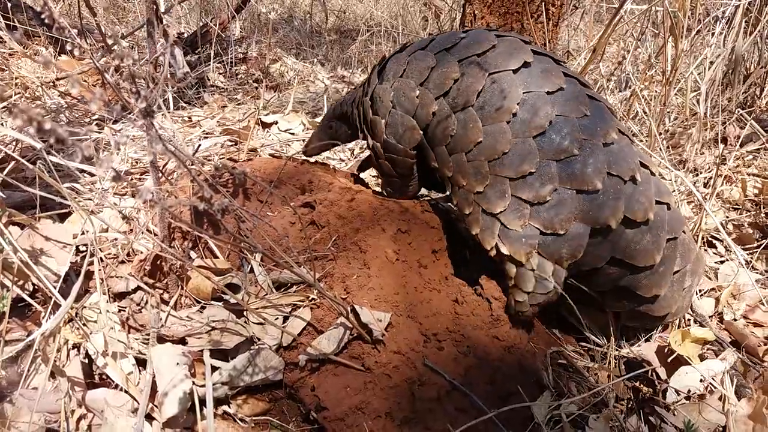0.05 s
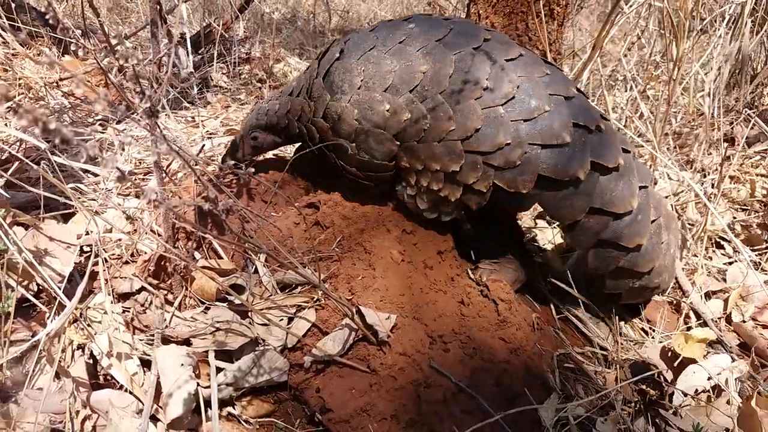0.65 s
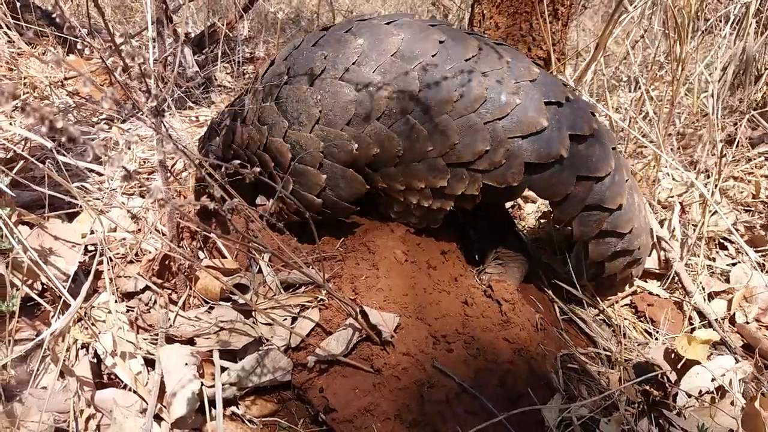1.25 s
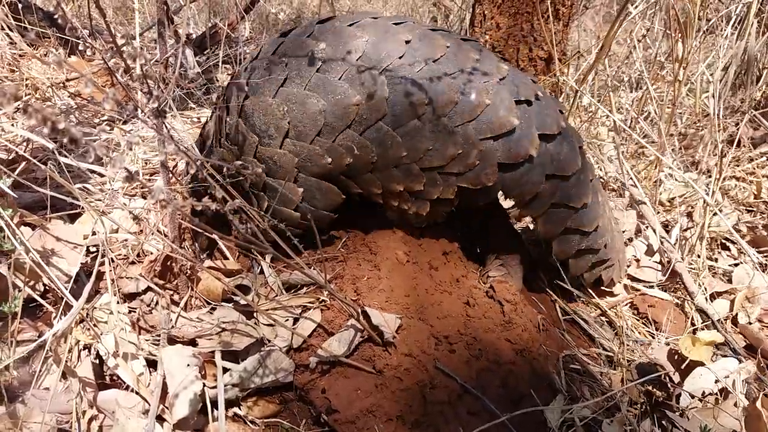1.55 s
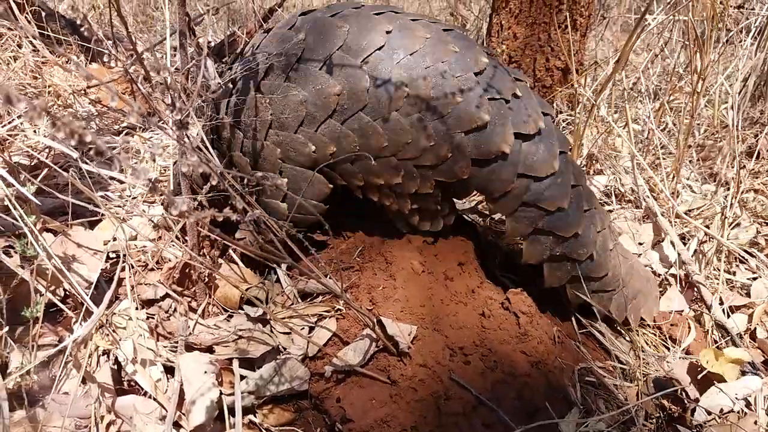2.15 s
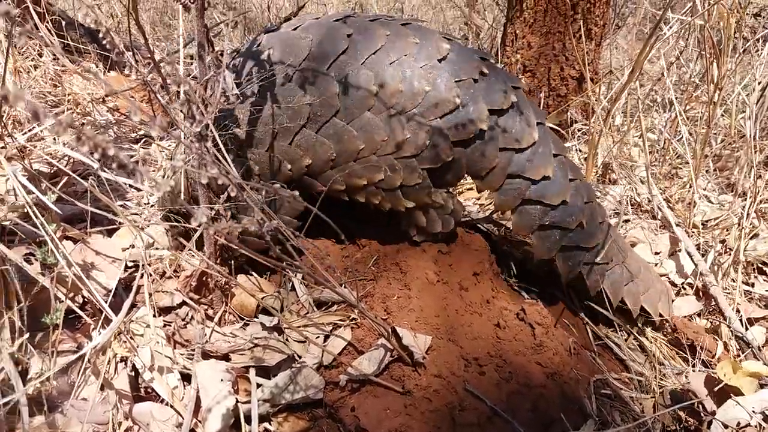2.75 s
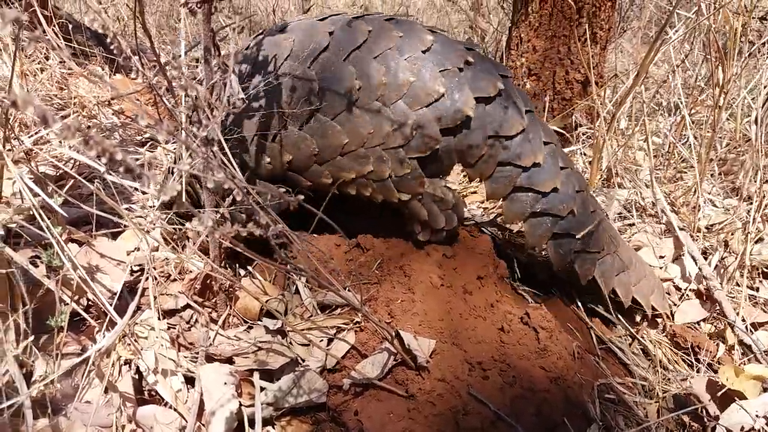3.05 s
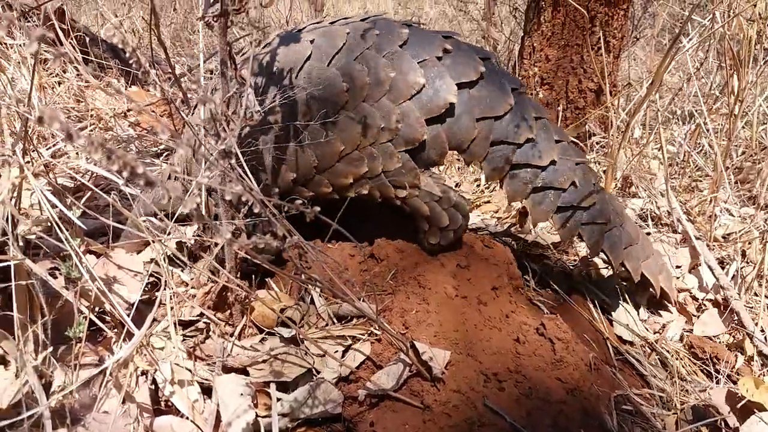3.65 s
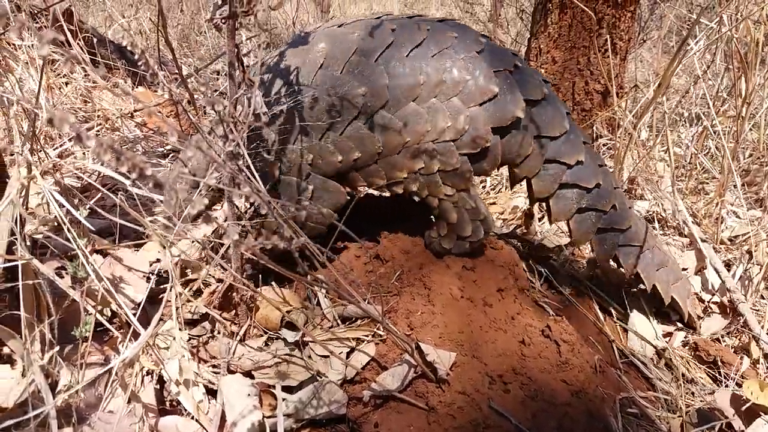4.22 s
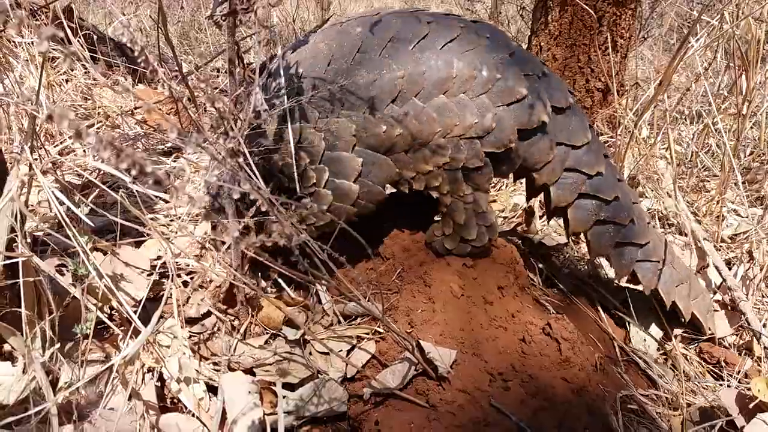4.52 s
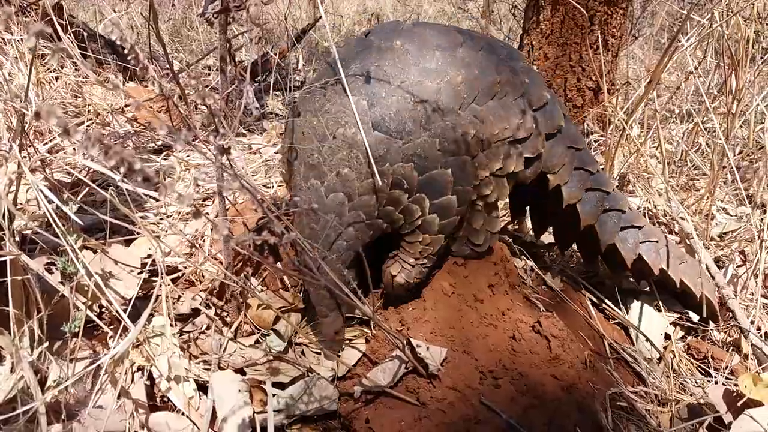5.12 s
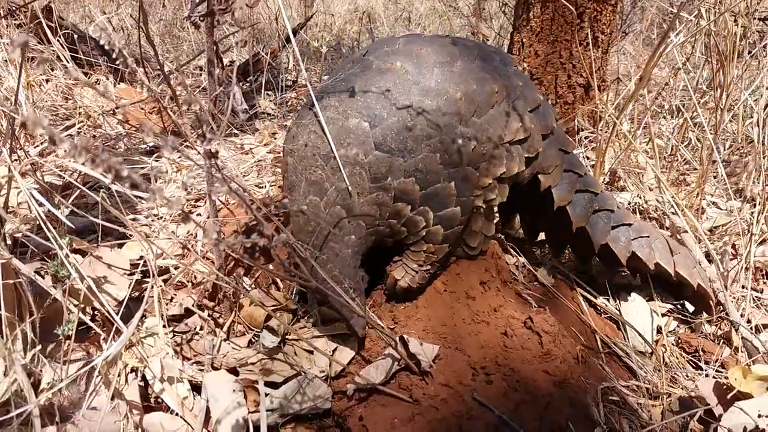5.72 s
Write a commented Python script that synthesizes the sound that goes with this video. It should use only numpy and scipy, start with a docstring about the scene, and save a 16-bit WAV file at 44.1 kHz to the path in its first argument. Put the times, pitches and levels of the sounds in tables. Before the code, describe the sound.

Claws scrape loose earth as brittle stems snap and dead leaves crackle in uneven bursts, close up over a low outdoor rumble.

```python
"""Dry bush, one microphone close to an earth mound, with a low rumble of open air behind it throughout.
A pangolin clambers over the mound: its claws scrape loose soil, and as it pushes its head into twigs
and leaves, stems snap in short clusters of fractures over a crackling rustle, hardest at 1.5 s.
A dull thump at 2.3 s, one faint far-off chirp at 2.7 s and a second thump at 3.4 s follow.
From there on the litter is mostly grass, and blades slide along the scales with a fine hiss."""
import sys
import numpy as np
from scipy import signal
from scipy.fft import rfft, irfft, next_fast_len
from scipy.io import wavfile
from scipy.ndimage import map_coordinates

SR = 44100
rng = np.random.default_rng(int(sys.argv[2]) if len(sys.argv) > 2 else 0)


def wav_record(signal):
    """Record a signal, one row per channel, as 16-bit PCM in the file named by sys.argv[1]."""
    frames = np.transpose(np.atleast_2d(signal))
    bounded = np.clip(frames, -1, 1)
    # unit amplitude maps onto the largest positive 16-bit level
    quanta = np.round(bounded * 32767).astype(np.int16)
    wavfile.write(sys.argv[1], SR, quanta)


N = 263718

# spectrum of brittle twigs and leaves: frequency_hz, level_db
TWIG_COLOUR = [(120, -23), (750, -14), (1290, -6), (1500, -8.5), (2050, -7.5), (2600, -4.5), (3760, -15.5),
               (5030, 0), (5870, -9.5), (6600, -7.5), (7700, -23), (9400, -18.5), (11000, -31.5),
               (14500, -29.5)]
# spectrum of dry grass: frequency_hz, level_db
GRASS_COLOUR = [(250, -28.5), (620, -27), (1240, -21), (1600, -3), (2080, 8), (2500, 3.5), (3150, -6.5),
                (3900, -13), (5030, 0.5), (5900, -4), (7500, -8), (8300, -8), (11400, -32), (13500, -20)]
# how much of the litter around the animal is grass: time_s, share (0-1)
GRASS_IN_LITTER = [(0, 0.14), (2.2, 0.21), (3.3, 0.23), (3.6, 0.61), (6, 0.85)]


def amp(db):
    return 10 ** (np.asarray(db) / 20)


def unit(x):
    return x / np.sqrt(np.mean(x ** 2) + 1e-20)


def along(points, hz):
    """Read (frequency, value) points on a log frequency axis."""
    knots_hz, values = np.transpose(points)
    return np.interp(np.log(hz + 1), np.log(knots_hz + 1), values)


def curves(rows):
    """One value per sample for each column after the time."""
    times, *columns = np.transpose(rows)
    return [np.interp(np.arange(N) / SR, times, column) for column in columns]


def wobble(rate):
    """A smooth random curve, rate knots a second."""
    return map_coordinates(rng.standard_normal(int(N * rate / SR) + 4), [np.arange(N) * rate / SR])


def filtered(x, response):
    """Filter x by a gain given as a function of frequency."""
    size = next_fast_len(len(x) + 4096)
    return irfft(rfft(x, size) * response(np.fft.rfftfreq(size, 1 / SR)), size)[:len(x)]


def band(hz, lo_hz, hi_hz, order=8):
    """Gain of a steep band-pass."""
    return 1 / np.sqrt((1 + (lo_hz / (hz + 1)) ** (2 * order)) * (1 + (hz / hi_hz) ** (2 * order)))


def peak(hz, centre_hz, width_hz):
    """A bell of height 1 around a resonance."""
    return 1 / (1 + (2 * (hz - centre_hz) / width_hz) ** 2)


def causal(gain):
    """The minimum-phase response with this gain: it rings only after the blow."""
    cepstrum = irfft(np.log(np.maximum(gain, gain.max() * 1e-5)))
    half = len(cepstrum) // 2
    return np.exp(rfft(np.r_[cepstrum[0], 2 * cepstrum[1:half], np.zeros(half)]))


def add(track, start_s, sound):
    """Mix a sound into the track."""
    span = track[max(round(start_s * SR), 0):][:len(sound)]
    span += sound[:len(span)]


def swell_db(strokes, resting_db):
    """Level of strokes that each build and settle exponentially, added in power to a resting level."""
    t, power = np.arange(N) / SR, amp(resting_db) ** 2
    for peak_s, level_db, build_s, settle_s in strokes:
        swell = np.exp(-np.maximum((peak_s - t) / build_s, (t - peak_s) / settle_s))
        power = power + (amp(level_db) * swell) ** 2
    return 10 * np.log10(power)


def litter_db(hz, grass):
    """Spectrum of litter with this share of grass."""
    return (1 - grass) * along(TWIG_COLOUR, hz) + grass * along(GRASS_COLOUR, hz)


def fractures(rate, spread_db, size=N):
    """Tiny breaks at random moments, rate a second, with log-normal strengths."""
    breaks = (rng.random(size) < rate / SR) * rng.choice([-1, 1], size)
    return breaks * amp(spread_db * rng.standard_normal(size))


def snaps(effort, size=4096):
    """Close by, each stem gives way in a burst of fractures that ring it and the leaves around it."""
    # stems and dead leaves: start_s, fade_s, strength_db, leaf_over_twig_db, ground_weight (0-1), pitch_hz
    stems = [(0.1396, 0.019, -39, -7.5, 0.2, 3300), (0.1405, 0.019, -38.5, 2, 0.53, 1680),
             (0.1898, 0.021, -57.5, 24, 0.3, 1850), (0.3, .009, -49.5, 3, 0.1, 2300),
             (0.3336, 0.01, -51.5, 0, 0.2, 2170), (0.3942, .013, -58.5, 22, 0.3, 2820),
             (0.6309, .014, -51.5, -13, 0.5, 2580), (0.6606, .022, -45.5, -18, 0.87, 1684),
             (0.7831, 0.024, -42, -4, 0.78, 2400), (0.8008, 0.015, -38, -5, 1, 2120),
             (0.8218, 0.013, -34.5, 5, 0.8, 2580), (0.8593, 0.026, -47.5, 2, 0.83, 3170),
             (0.9192, .016, -47, 3, 0.56, 2630), (0.9538, 0.0059, -45, 6, 0.6, 2540),
             (1.03, 0.0091, -49.5, -12.5, 0.3, 2500), (1.0661, 0.024, -47, 1, 0.4, 2200),
             (1.163, 0.053, -38.5, -1, 0.8, 2360), (1.2876, 0.033, -42, 1, 0.9, 1780),
             (1.4497, 0.023, -38.5, -0.5, 0.5, 2390), (1.472, 0.017, -29, 4, 0.48, 2570),
             (1.4787, 0.014, -33, -9, 0.78, 2230), (1.5118, .014, -40.5, 20, 0.4, 2650),
             (1.5148, 0.025, -22, -9.5, 0.79, 2350), (1.5235, 0.031, -25, -0.5, 0.72, 2270),
             (1.5928, 0.0094, -36.5, -9, 0.4, 2140), (1.6369, 0.0083, -39, 4, 0.3, 2020),
             (1.659, 0.0094, -37, -10.5, 0.67, 2500), (1.7205, 0.0062, -39.5, -8, 0.3, 2720),
             (1.764, 0.012, -39, 3.5, 0, 2820), (1.8699, 0.0068, -31.5, 0.5, 0, 2570),
             (1.8751, .045, -32.5, 1.5, 0.2, 2060), (1.9157, 0.0095, -33, 3, 0, 2580),
             (2.0017, 0.02, -35.5, 1, 0.47, 1980), (2.049, 0.038, -27.5, 2, 0.57, 2100),
             (2.0796, 0.012, -29, 11.5, 0.3, 1710), (2.1072, 0.016, -28.5, -3.5, 0.77, 2190),
             (2.341, 0.016, -35.5, -5.5, 0.85, 2640), (2.3667, 0.025, -41.5, 2, 0.54, 2070),
             (2.4686, .014, -46.5, -3, 0.9, 1820), (2.6352, 0.0064, -39.5, -2, 0.52, 2500),
             (2.6637, 0.021, -43.5, -5, 0.83, 2770), (2.9133, .047, -48, 2, 0.76, 2520),
             (2.9383, 0.0045, -47.5, 4, 0.85, 2610), (3.1683, 0.034, -40.5, 3, 0.79, 2420),
             (3.3942, 0.017, -40.5, 8.5, 0.47, 3130), (3.5063, 0.026, -48.5, 3, 0.1, 1970),
             (3.6308, 0.0076, -45, 6, 0.5, 1950), (3.6626, 0.0091, -49, 9, 0.2, 2400),
             (3.8367, .07, -41, -0.5, 0.65, 1560), (3.9037, 0.016, -42.5, -12, 1, 1610),
             (4.0102, 0.029, -45.5, 1, 0.9, 1590), (4.111, 0.016, -31.5, -1, 0.66, 2600),
             (4.2135, 0.0055, -41, 5, 0, 2400), (4.4078, 0.015, -38, -2.5, 0.58, 2460),
             (4.4584, 0.031, -29, 1, 0.5, 2640), (4.5553, 0.011, -28.5, -11.5, 0.26, 2500),
             (4.5972, 0.033, -44.5, -2, 0.85, 1640), (4.9427, .035, -38, 1.5, 0.5, 2130),
             (5.0186, 0.024, -42.5, 1, .1, 2500), (5.0671, 0.013, -42.5, 5, .15, 2300),
             (5.1053, 0.035, -43.5, 1.5, 0.58, 2190), (5.3683, 0.04, -45.5, 9.5, .4, 1970),
             (5.4612, 0.022, -48.5, 16.5, 0.68, 2110), (5.6281, 0.031, -47, 0.5, 0.78, 2440),
             (5.7124, 0.015, -51.5, 6, 0.6, 2220), (5.7898, 0.024, -49.5, 6, .7, 2130),
             (5.8428, 0.012, -52, -5, 0.4, 2120)]
    out, t, hz = np.zeros(N), np.arange(size) / SR, np.fft.rfftfreq(size, 1 / SR)
    # ranges of earth knock, twig body, leaf crack and splinter fizz
    zones = [band(hz, 70, 1320), band(hz, 1480, 3700), band(hz, 3700, 7700), band(hz, 7700, 16000)]
    scatter = amp(-36 - 60 * t / 0.1)  # weak returns from the ground and the stems nearby
    for start_s, fade_s, strength_db, leafy_db, weight, twig_hz in stems + stray_stems(effort):
        grass = np.interp(start_s, *np.transpose(GRASS_IN_LITTER))
        # no two stems ring alike: a twig mode and a leaf mode stand among random weaker ones
        leaf_hz = 5055 * np.exp(0.05 * rng.standard_normal())
        ripple = np.interp(hz, np.linspace(0, SR / 2, 70), rng.standard_normal(70))
        modes_db = 11 * peak(hz, twig_hz, width_hz=440) + 7 * peak(hz, leaf_hz, width_hz=130)
        colour = amp(1.065 * litter_db(hz, grass) + modes_db + 2.4 * ripple)
        fade_s = max(fade_s, 0.004)
        rise = (1 - np.exp(-t / (0.074 * fade_s))) ** 2  # a slow break also builds up slowly
        envelope = rise * (amp(-78 * t / fade_s) + scatter)
        burst = rfft(envelope * fractures(rate=9200, spread_db=2.0, size=size))
        power = 0
        for level_db, zone in zip(snap_balance(strength_db, leafy_db, weight, grass), zones):
            power += (amp(level_db) * zone / np.linalg.norm(irfft(burst * colour * zone))) ** 2
        snap = irfft(burst * causal(np.sqrt(power) * colour))
        add(out, start_s, snap * np.sqrt(0.0032 * SR))
    return out


def snap_balance(strength_db, leafy_db, weight, grass):
    """Levels of a snap's four parts: weight knocks the ground, grass splinters."""
    knock_db = strength_db - 25.5 + 26 * np.clip(weight, 0, 1)
    body_db, crack_db = strength_db - leafy_db / 2, strength_db + leafy_db / 2
    fizz_db = crack_db - 16.5 + 6 * grass
    return knock_db, body_db, crack_db, fizz_db


def stray_stems(effort, count=60, firm_shove_db=-50, weight=0.35):
    """Rows for small stems that break by chance: more often and louder under a harder shove."""
    chance, variations = rng.random(count), rng.standard_normal((count, 4))
    strain = np.cumsum(np.sqrt(amp(effort)))
    starts = np.searchsorted(strain, chance * strain[-1])
    rows = []
    for start, (fade, force, leafy, pitch) in zip(starts, variations):
        strength_db = -49 + 0.56 * (effort[start] - firm_shove_db) + 2 * force
        fade_s, pitch_hz = 0.0091 * np.exp(0.23 * fade), 2330 * np.exp(0.12 * pitch)
        rows.append((start / SR, fade_s, strength_db, 5 * leafy, weight, pitch_hz))
    return rows


def rustle(effort):
    """Scales and claws crush the litter in clumps of tiny breaks and scrape the soil."""
    grass = curves(GRASS_IN_LITTER)[0]
    twig_db = effort + 0.24 - 2.8 * grass
    leaf_db = effort - 2 + 4.8 * grass
    soil_db = effort - 5.5 - 1.2 * grass
    # each small collapse sets off breaks for a few milliseconds, over a steady scrape
    t = np.arange(SR // 25) / SR
    starts = (rng.random(N) < 140 / SR) * amp(-12 * rng.random(N))
    collapse = (1 - np.exp(-t / 0.00011)) * np.exp(-t / 0.0069)
    collapses = unit(signal.fftconvolve(starts, collapse)[:N])
    clumps = unit(np.sqrt(0.84 + collapses ** 2))
    twig_ticks = amp(-6.5) * ticks(grass, 1735, 3050, rate=200, spread_db=8.5, t60_s=0.018)
    leaf_ticks = amp(-4.5) * ticks(grass, 4250, 6970, rate=300, spread_db=13, t60_s=0.011)
    twigs = amp(twig_db) * (crackle(clumps, grass, 1400, 3700, rate=3300) + twig_ticks)
    leaves = amp(leaf_db) * (crackle(clumps, grass, 3700, 16000, rate=5000) + leaf_ticks)
    soil = amp(soil_db) * crackle(clumps, grass, 250, 1350, rate=2500)
    # the body's weight also presses a low shuffle out of the mound
    shuffle = amp(soil_db - 13.5) * crackle(clumps, grass, 50, 230, rate=200)
    return twigs + leaves + soil + shuffle


def crackle(clumps, grass, lo_hz, hi_hz, rate):
    """An uneven train of breaks heard through one range of the litter, twigs giving way to grass."""
    breaks = clumps * amp(1.9 * wobble(200)) * unit(fractures(rate, spread_db=0.5))
    twigs = filtered(breaks, lambda hz: amp(along(TWIG_COLOUR, hz)) * band(hz, lo_hz, hi_hz))
    blades = filtered(breaks, lambda hz: amp(along(GRASS_COLOUR, hz)) * band(hz, lo_hz, hi_hz))
    return (1 - grass) * unit(twigs) + grass * unit(blades)


def ticks(grass, lo_hz, hi_hz, rate, spread_db, t60_s, size=400):
    """Single leaf edges flick past a scale, each ringing briefly at its own pitch."""
    moment, pitch, force = rng.random((int(rate * N / SR), 3)).T
    starts = (moment * N).astype(int)
    hz = lo_hz * (hi_hz / lo_hz) ** pitch
    strength = amp(litter_db(hz, grass[starts]) + spread_db * force ** 2) * np.sqrt(hz)
    t = np.arange(size) / SR
    cycles = hz[:, None] * t
    envelope = (1 - np.exp(-cycles)) * amp(-60 * t / t60_s)
    rings = strength[:, None] * envelope * np.sin(2 * np.pi * cycles)
    samples = starts[:, None] + np.arange(size)
    return unit(np.bincount(samples.ravel(), rings.ravel(), N)[:N])


def grass_swipes():
    """Grass blades stick and slip over the edges of the scales with a fine hiss."""
    # blades sliding past: peak_s, level_db, build_s, settle_s
    strokes = [(3.54, -62, .08, .07), (4.22, -67, .03, 0.077), (4.8, -57, 0.15, 0.15),
               (5.02, -58, .08, 0.21), (5.37, -49, .015, .015)]
    # spectrum of the slipping: frequency_hz, level_db
    colour = [(3000, -30), (6000, -11), (8300, -3), (11400, -3), (13500, -1), (16000, 3)]
    slips = fractures(rate=3800, spread_db=9) * amp(2.5 * wobble(70))
    hiss = unit(filtered(slips, lambda hz: amp(along(colour, hz))))
    return amp(swell_db(strokes, resting_db=-117)) * hiss


def thumps(floor_hz=42, glide_s=0.00145, t60_s=0.14):
    """Behind the rustle, dull knocks whose pitch plunges into a low thud as they die."""
    # dull knocks: start_s, level_db, first_pitch_hz
    knocks = [(2.3349, -40, 870), (3.4293, -43, 430)]
    out, t = np.zeros(N), np.arange(SR // 4) / SR
    for start_s, level_db, first_hz in knocks:
        pitch_hz = floor_hz + (first_hz - floor_hz) / (1 + t / glide_s)
        thud_db = 6 * peak(pitch_hz, centre_hz=118, width_hz=58)
        envelope = amp(level_db - 60 * t / t60_s + thud_db)
        add(out, start_s, envelope * np.sin(2 * np.pi * np.cumsum(pitch_hz) / SR))
    return filtered(out, lambda hz: band(hz, 46, 3000, order=4))


def bird():
    """One faint rising chirp from far off."""
    # course of the chirp: time_s, pitch_hz, level_db
    chirp = [(2.68, 2840, -75), (2.693, 2960, -70), (2.718, 3140, -65), (2.73, 3720, -66),
             (2.745, 3850, -80)]
    pitch_hz, level_db = curves(chirp)
    t = np.arange(N) / SR
    singing = (t > chirp[0][0]) & (t < chirp[-1][0])
    return amp(level_db) * np.sin(2 * np.pi * np.cumsum(pitch_hz) / SR) * singing


def open_air():
    """The bed of the place: soft hiss, an uneven low rumble and a distant drone that swells briefly."""
    # spectrum of the air: frequency_hz, level_db
    hiss_colour = [(20, -55), (50, -33), (140, -8.5), (380, -9.5), (1300, -14.5), (2400, -23.5),
                   (3800, -18), (5100, -25), (7700, -22.5), (15500, -22.5)]
    # slow drift of the rumble: time_s, level_db
    rumble_drift = [(0, -65), (2, -63.5), (4, -64.5), (6, -66)]
    # swell of the drone: time_s, level_db
    drone_swell = [(2.70, -71), (2.73, -57.5), (2.78, -67), (2.95, -64), (3.1, -71), (3.3, -74)]

    def noise(response):
        return unit(filtered(rng.standard_normal(N), response))

    hiss = amp(-65.5) * noise(lambda hz: amp(along(hiss_colour, hz)))
    rumble_db = curves(rumble_drift)[0] + 1.55 * wobble(6.1)
    rumble = amp(rumble_db) * noise(lambda hz: band(hz, 53, 9000, order=6) * band(hz, 20, 122, order=2))
    drone = amp(curves(drone_swell)[0]) * noise(lambda hz: band(hz, 230, 384, order=5))
    return hiss + rumble + drone


def scene():
    """One channel from beside the mound: the animal's effort (dB) drives the rustle and small snaps."""
    # shoves of the body against the litter: peak_s, level_db, build_s, settle_s
    shoves = [(0.158, -56.5, 0.014, 0.056), (0.42, -64, .1, .25), (0.668, -49.5, .04, 0.054),
              (0.818, -52, .09, 0.057), (0.95, -56, .06, .012), (1.052, -54.5, .025, 0.045),
              (1.368, -57.5, .07, .07), (1.53, -46.5, .045, .15), (1.701, -46.5, .06, .12),
              (1.88, -45, 0.076, 0.17), (2.1, -40, .095, .066), (2.361, -51, 0.048, .16),
              (2.62, -58.5, .12, 0.027), (3.028, -56.5, 0.15, .025), (3.128, -58, .025, .04),
              (3.23, -58, .03, 0.018), (3.47, -51, .05, 0.028), (3.553, -49, .022, .04),
              (3.699, -61.5, .08, 0.074), (3.84, -55.5, .04, .15), (4.01, -55.5, .09, .018),
              (4.104, -49.5, 0.013, .06), (4.199, -50.5, 0.054, .3), (4.46, -46.5, .06, .1),
              (4.821, -48.5, .09, .11), (5.0, -50.5, .06, .2), (5.35, -53, .028, .028),
              (5.798, -61.5, .2, 0.11)]
    effort = swell_db(shoves, resting_db=-68.5)  # the litter never quite stops stirring
    return (snaps(effort) + rustle(effort) + grass_swipes() + thumps() + bird() + open_air())[None]


def record(dry, top_hz=15850):
    """At the microphone the level comes up at the start, and nothing above the band limit is kept."""
    # opening rise in level: time_s, gain_db
    opening = [(.07, -3.5), (.13, 0)]
    gain = amp(curves(opening)[0])
    return np.array([filtered(channel * gain, lambda hz: hz < top_hz) for channel in dry])


dry = scene()
out = record(dry)
wav_record(out)
```